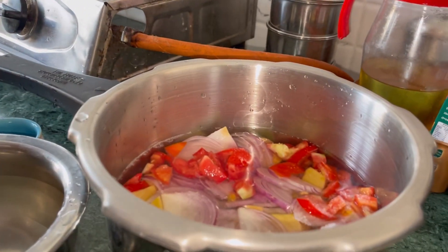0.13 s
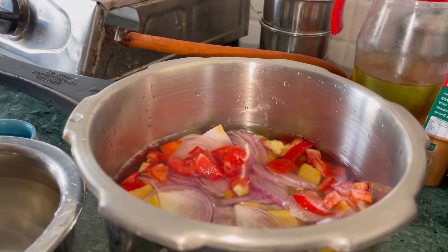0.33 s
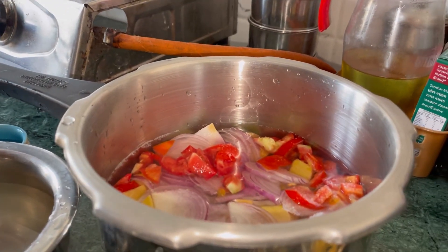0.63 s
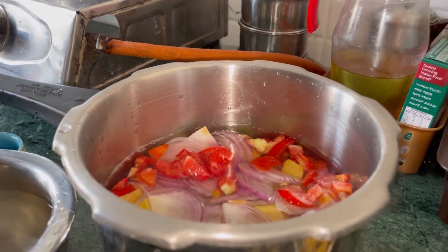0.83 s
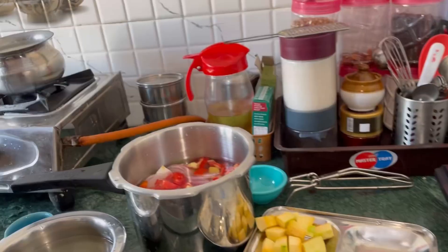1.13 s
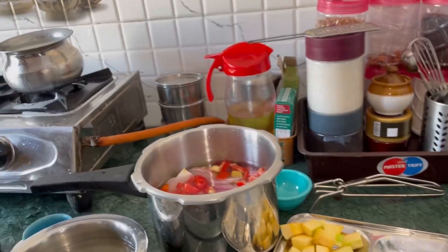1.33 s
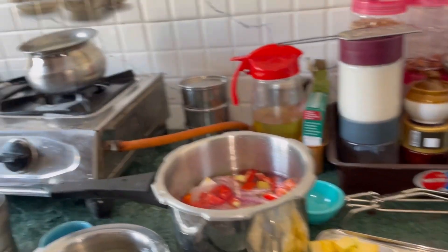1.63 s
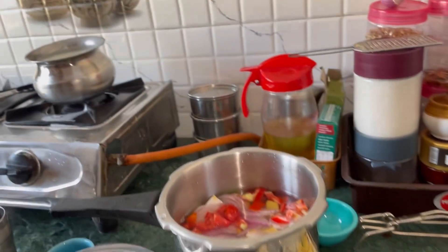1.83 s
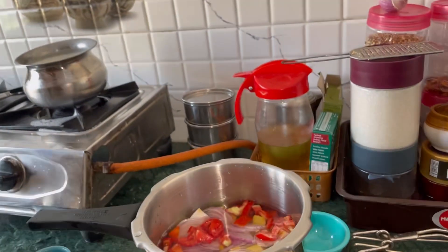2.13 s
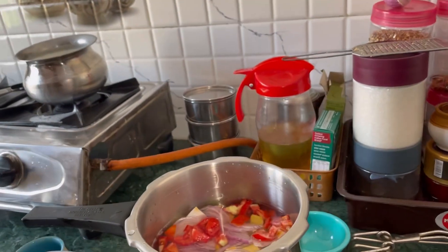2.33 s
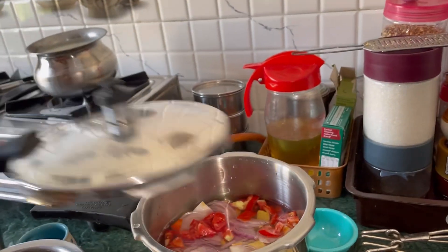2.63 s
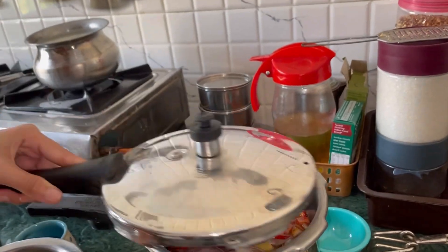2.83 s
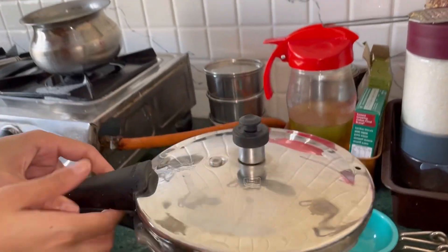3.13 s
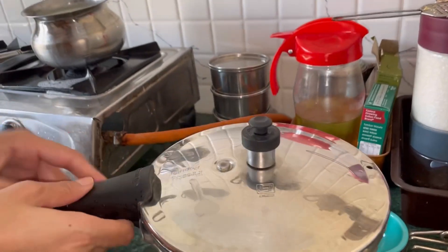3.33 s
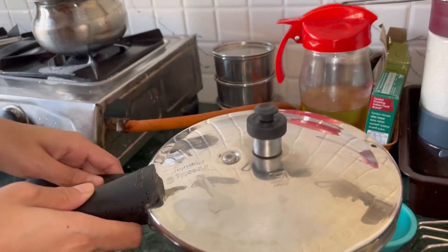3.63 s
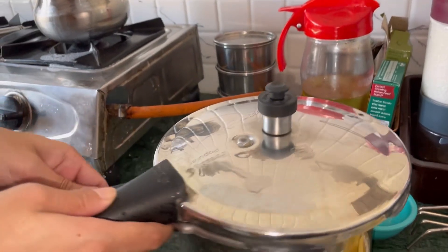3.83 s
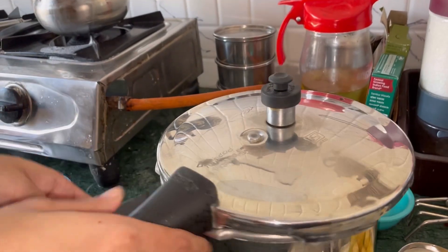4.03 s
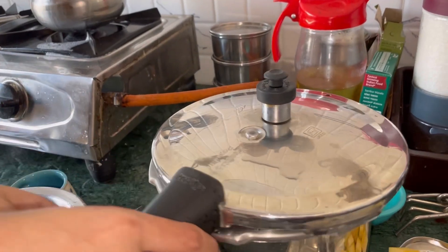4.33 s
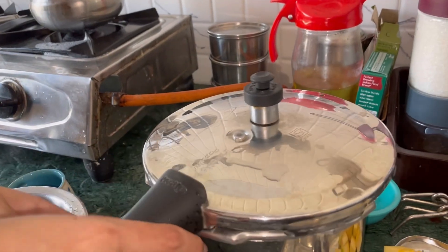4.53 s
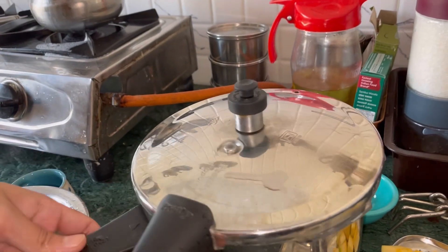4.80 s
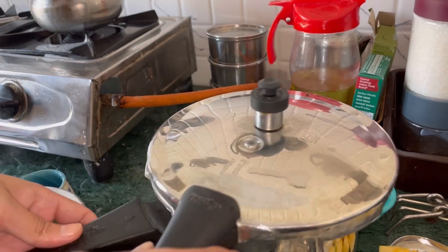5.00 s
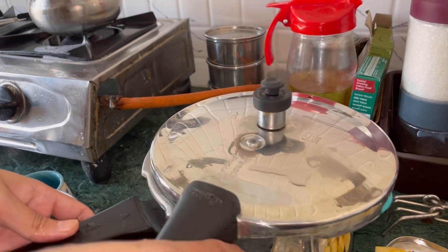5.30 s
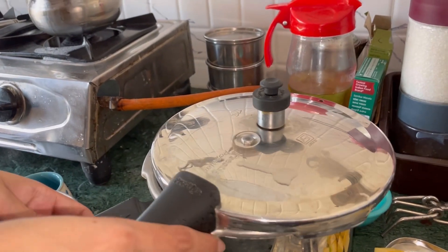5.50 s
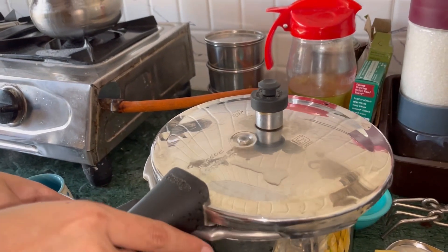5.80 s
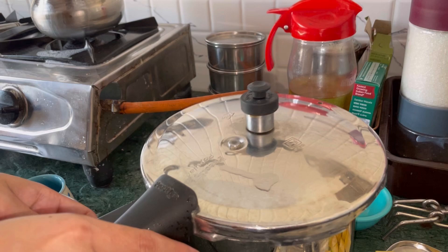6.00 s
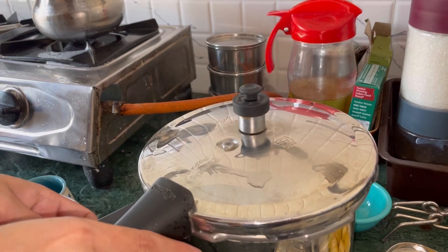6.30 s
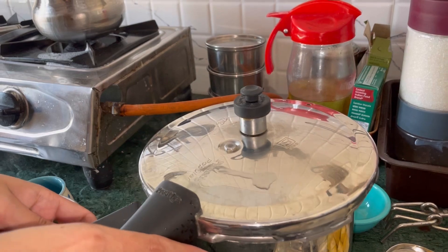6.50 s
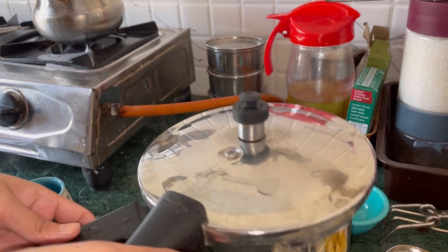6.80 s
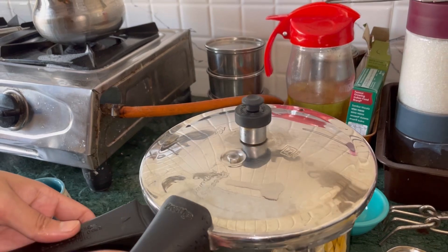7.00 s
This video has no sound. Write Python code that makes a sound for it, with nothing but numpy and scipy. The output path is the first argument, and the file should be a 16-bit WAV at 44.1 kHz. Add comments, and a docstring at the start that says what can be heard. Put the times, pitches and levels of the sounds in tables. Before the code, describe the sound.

Sharp metallic clinks, rattles and scrapes of a lid being fitted onto a pressure cooker, with hollow knocks and dull thumps on the counter.

```python
"""A small tiled kitchen, close to the counter, on a microphone with two ports a little apart.
A steel pressure cooker lid is lifted, set on its pot and twisted shut. The lid clinks and rattles
as blows ring its modes, and scrapes along the rim. A loose small part jingles, the rocking pot
thumps the counter, the air shut in the pot booms and the pot wall rings. Low room hum lies under it."""
import sys
import numpy as np
from scipy import signal
from scipy.fft import rfft, irfft, next_fast_len
from scipy.io import wavfile
from scipy.ndimage import uniform_filter1d

SR = 44100
rng = np.random.default_rng(int(sys.argv[2]) if len(sys.argv) > 2 else 0)


def bounce(signal):
    """Save signal as a 16-bit WAV file at the path given by the first command-line argument."""
    frames = np.transpose(np.atleast_2d(signal))
    limited = np.clip(frames, -1, 1)
    pcm = np.round(limited * 32767).astype(np.int16)
    wavfile.write(sys.argv[1], SR, pcm)


N = 315315

# the steel lid's modes: pitch_hz, relative_db, base_t60_s
LID_MODES = [(657, -7, 0.042), (742, 1.5, 0.13), (965, -13, 0.16), (1198, -1, 0.36), (1504, 1.5, 0.17),
             (2043, -1.5, 0.068), (2250, -9, 0.018), (2327, -8.5, 0.11), (2405, -7, 0.26), (2410, -5, 0.23),
             (2657, -6, 0.15), (2861, -6, 0.11), (3080, -2.5, 0.18), (3250, -7.5, 0.45), (3476, -6.5, 0.23),
             (3760, -11, 0.18), (4050, -1.5, 0.13), (4364, -8, 0.26), (4427, -8.5, 0.14), (4696, -5, 0.11),
             (5240, -12, 0.26), (5670, -9.5, 0.13), (6180, -1, 0.15), (6970, 1, 0.21), (7970, 12.5, 0.14),
             (8330, 13, 0.14), (9060, 7, .14), (8960, -17, 0.11), (10490, 7.5, 0.14), (11300, -16, 0.048)]
# the hiss of countless close modes between them: frequency_hz, density_db
LID_SHIMMER = [(400, -9.5), (700, 8.5), (1700, -0.5), (2500, 0.5), (4500, -5), (6500, -5.5), (8500, 6),
               (10500, 2.5), (13000, -6.5), (14000, 1), (16500, -48)]
# knocks of the lid on the pot: start_s, air_level_db, wall_above_air_db
POT_KNOCKS = [(2.959, -16, -6), (3.019, -19.5, -8), (3.053, -14, -15), (3.086, -20.5, -23),
              (3.156, -25.5, -8), (3.178, -23, -19), (3.204, -23, -11), (3.228, -25.5, -9),
              (3.437, -14.5, -12), (3.632, -24, -35), (3.658, -27, -30), (3.73, -25, -19),
              (3.755, -25, -19), (4.418, -19, -12), (4.538, -24.5, -23), (4.603, -29.5, -9),
              (4.661, -18, -28), (4.684, -19.5, -12), (4.712, -20, -30), (4.766, -20.5, -38),
              (4.784, -22.5, -31), (4.887, -18.5, -10), (4.906, -20, -26), (4.968, -19.5, -11),
              (4.983, -25, 1), (5.152, -24, -41), (5.343, -23, -24), (5.426, -29, -9), (5.465, -25, -25),
              (6.021, -18, -3.5), (6.148, -20.5, -25), (6.244, -25, -13), (6.603, -32, -29),
              (6.644, -27.5, -16), (6.771, -27.5, -27)]
SEATED_S = 2.9  # from here on the lid lies on the pot


def gain_of(db):
    """Decibels to amplitude."""
    return 10 ** (np.asarray(db) / 20)


def unit_rms(x):
    """Scales to an rms of one."""
    return x / np.sqrt(np.mean(x ** 2) + 1e-20)


def curve_at(points, hz, column=1):
    """Reads a table's column over a log-frequency axis."""
    table = np.transpose(points)
    return np.interp(np.log(hz + 1), np.log(table[0] + 1), table[column])


def add(mix, start_s, sound):
    """Mixes a sound in at a time."""
    part = mix[max(round(start_s * SR), 0):][:len(sound)]
    part += sound[:len(part)]


def coloured_noise(size, band_db):
    """White noise with a gain for each frequency bin."""
    return irfft(rfft(rng.standard_normal(size)) * gain_of(band_db), size)


def ring(hz, db, t60, rise_s):
    """Struck modes: dying sines of random phase."""
    t = np.arange(round(min(np.max(t60), 1 / 3) * SR))[:, None] / SR
    tones = np.sin(2 * np.pi * (hz * t + rng.random(np.size(hz))))
    return (gain_of(db - 60 * t / t60) * tones).sum(1) * (1 - np.exp(-t[:, 0] / rise_s))


def struck_db(modes, near_hz, lift_db):
    """Mode levels for one blow: uneven, and lifted for the modes nearest to it."""
    hz, db, _ = np.transpose(modes)
    nearness = np.exp(-(np.log(hz[:, None] / near_hz) / .03) ** 2).max(1)
    return db + lift_db * nearness + 1.36 * rng.standard_normal(len(hz))


def tilt_db(hz, treble_db, low_db):
    """Level of the lid's treble and low modes against the middle ones."""
    return np.interp(hz, [1700, 1900, 6500, 8000], [low_db, 0, 0, treble_db])


def room_hum():
    """Room tone: two unrelated low noises with drifting patches of colour; the level dips briefly."""
    # the hum's colour: frequency_hz, density_db
    spectrum = [(20, -34), (40, -39.5), (65, 7), (105, 1), (170, -4.5), (345, -7), (690, -10.5),
                (1400, -13.5), (2070, -23), (4000, -29.5), (6500, -36), (9000, -39.5), (12700, -47),
                (14000, -55), (16500, -65)]
    # its course: time_s, level_db, treble_lift_db
    course = [(0, -46, 13), (1.06, -45, 0), (1.12, -49.5, 7), (1.15, -44.5, 4), (1.9, -43.5, 1),
              (2.3, -42, 4.5), (2.9, -44, 0), (7.15, -44, -0.5)]
    time_s, level_db, treble_db = np.transpose(course)
    frames, hz = N // 256 + 5, np.fft.rfftfreq(1024, 1 / SR)
    draws = rng.standard_normal((frames, 513, 5)).T
    noise = draws[[0, 2]] + 1j * draws[[1, 3]]
    patches_db = 2.16 * unit_rms(uniform_filter1d(uniform_filter1d(draws[4], 8, 0), 14, 1))
    treble_share = np.clip((hz[:, None] - 1500) / 2500, 0, 1)
    lift_db = treble_share * np.interp(np.arange(frames) * 256 / SR, time_s, treble_db)
    noise *= gain_of(curve_at(spectrum, hz)[:, None] + patches_db + lift_db)
    hum = signal.istft(noise, nperseg=1024, noverlap=768)[1][:, :N]
    return unit_rms(hum) * gain_of(np.interp(np.arange(N) / SR, time_s, level_db))


def lid_blow(start_s, level_db, treble_db, low_db, lower_hz, upper_hz, seated_ring):
    """One blow on the lid: a crack, a hiss of close modes, and modes that dents split into beating pairs."""
    rise_s, split, gasket_t60_s, gasket_low_db = .0016, 0.011, 0.63, -29
    hz, _, t60 = np.transpose(LID_MODES)
    seated = start_s > SEATED_S  # the gasket then damps every mode and mutes the lowest
    ring_factor = seated_ring if seated else 1
    t60 = ring_factor / (1 / t60 + seated / gasket_t60_s)
    mode_db = struck_db(LID_MODES, [lower_hz, upper_hz], lift_db=16)
    middle = (hz > 1900) & (hz < 6300)
    mode_db -= 10 * np.log10(np.sum(gain_of(mode_db[middle]) ** 2))
    mode_db += tilt_db(hz, treble_db, low_db + seated * gasket_low_db)

    t = np.arange(16384) / SR
    f = np.fft.rfftfreq(len(t), 1 / SR)
    # a few close modes stand out, most of all near the blow
    lumps_db = 3.06 * unit_rms(uniform_filter1d(rng.standard_normal(len(f)), size=20)) - 4
    lumps_db += 4.5 * np.exp(-(np.log((f[:, None] + 1) / [lower_hz, upper_hz]) / 0.054) ** 2).max(1)
    hiss = coloured_noise(len(t), curve_at(LID_SHIMMER, f) + tilt_db(f, treble_db, low_db) + lumps_db)
    shimmer = gain_of(4 - 60 * t / (0.17 * ring_factor))
    crack = gain_of(11 - 60 * t / 0.012)
    out = np.pad(hiss * (shimmer + crack) * (1 - np.exp(-t / rise_s)), (0, SR // 2))
    add(out, 0, ring(hz, mode_db - 4, 1.035 * t60, rise_s))
    twin_hz = hz * (1 + split * rng.uniform(-1.05, 1, len(hz)))  # shifts with how the lid is held
    add(out, 0, ring(twin_hz, mode_db, .5 * t60, rise_s))
    return gain_of(level_db) * out


def lid_clinks():
    """Single blows on the lid, and rattles that smear a blow over a swarm of small contacts."""
    # blows, each with its two nearest modes: start_s, level_db, treble_db, low_db, lower_hz, upper_hz
    blows = [(0.0074, -22.5, -11.5, -9.5, 2620, 3730), (0.0150, -28.5, -17, -14, 2950, 4660),
             (1.1416, -45, -15, 7.5, 2440, 3140), (1.2033, -28, -14, -6.5, 1500, 2640),
             (1.2753, -21, -9.5, -8, 1500, 3150), (1.3602, -9.5, -15.5, -1, 2660, 2812),
             (1.2790, -24.5, -20, -24, 2345, 4660), (1.3778, -14.5, -16, -5, 2367, 3300),
             (1.4343, -25.5, -18, -32, 2630, 3240), (1.5985, -42, -24, 3, 2440, 3110),
             (1.8986, -30.5, -40, -22, 2860, 3020), (2.635, -23, -15, -21, 2466, 3016),
             (2.9607, -13, -8.5, -9.5, 2540, 3130), (3.0186, -23.5, -10, -15, 2370, 4700),
             (3.052, -17, -16, -11, 2205, 4560), (3.176, -33, -13.5, 2, 2490, 3800),
             (3.2296, -23.5, -12, 0, 2980, 4210), (3.251, -31, -31, -6, 2020, 2960),
             (3.4068, -39, -20, 2, 1910, 3020), (3.435, -18, -5.5, -1, 2050, 6170),
             (3.4548, -18, -24, -1.5, 2080, 4130), (3.6585, -35.5, -33, 4, 2430, 3150),
             (3.7257, -27.5, -14.5, -0.5, 2550, 4230), (3.8678, -32.5, -18, -1.5, 2820, 3560),
             (4.033, -38.5, -26, -5, 2530, 4560), (4.3332, -34.5, -19, 3, 2370, 3090),
             (4.4617, -23.5, -15.5, -9, 2470, 4590), (4.6046, -30, -19, 1, 2390, 3210),
             (4.6591, -29.5, -14, -2, 2370, 3900), (4.7739, -16, -13, -12, 2470, 4460),
             (4.9814, -14.5, -3.5, -16, 2360, 4620), (5.0095, -19.5, -34, -30, 2300, 3310),
             (5.0903, -21.5, -16, -11, 2760, 3170), (5.3732, -35, -25, -4, 2300, 3240),
             (5.894, -40, -41, -11, 2380, 3200), (6.0177, -20, -13, -3, 2490, 4490),
             (6.145, -25, -13.5, -5.5, 2320, 4130), (6.1938, -35, -22, -21, 2340, 3800),
             (6.2417, -30.5, -7.5, -0.5, 2460, 4370), (6.4408, -44.5, -32, 3, 2420, 3810),
             (6.644, -24, -14.5, -12, 2366, 3660), (6.765, -39, -17, 2, 2400, 4500)]
    # chattering contacts: the same columns, then chatter_s
    rattles = [(1.9168, -15, -20, -31, 2810, 2987, 0.015), (1.9535, -15, -11, -23, 3830, 4756, 0.011),
               (4.4165, -24, -15, -2, 2280, 2970, 0.0024), (4.6936, -25, -19, 4.5, 2260, 3960, 0.0034),
               (4.8828, -18, -4, -5, 2380, 3600, 0.0086), (4.9044, -25, -13, -19, 2130, 3530, 0.0053),
               (4.9334, -24, -15, -3, 2350, 4700, 0.0067), (6.5972, -31, -19, -8, 2400, 4660, 0.0099),
               (6.7849, -22, -20, -7, 2430, 3900, 0.0063), (6.8214, -19.5, -21, -7, 2440, 3440, 0.0026),
               (6.8480, -11.5, -13.5, -14, 2070, 4540, 0.0012)]
    out, t = np.zeros(N), np.arange(4096) / SR
    for start_s, *blow in blows:
        add(out, start_s, lid_blow(start_s, *blow, seated_ring=0.71))
    for start_s, *blow, chatter_s in rattles:
        swarm = rng.standard_normal(len(t)) * t * np.exp(-t / chatter_s)
        clink = lid_blow(start_s, *blow, seated_ring=0.56)
        add(out, start_s, signal.fftconvolve(clink, swarm / np.linalg.norm(swarm)))
    return out


def part_jingles():
    """A small loose steel part taps lightly: modes in beating pairs, and a bright fizz."""
    # taps, each with its two nearest modes: start_s, level_db, lower_hz, upper_hz
    taps = [(0.2796, -49, 3770, 9200), (0.7287, -32, 5000, 9420), (0.763, -31, 4950, 13760),
            (0.7903, -29.5, 4525, 8440), (0.859, -30, 4292, 9300), (1.6203, -46.5, 3800, 9840),
            (1.8444, -53, 4440, 9400), (2.239, -50, 4770, 8500)]
    # the part's modes: pitch_hz, relative_db, t60_s
    modes = [(3490, -11, 0.09), (4417, -12.5, 0.14), (5060, -12, 0.1), (8500, -2.5, 0.074),
             (9230, -7, 0.063), (9940, -6, 0.18), (10500, -20, 0.11), (11000, -26, .15), (11900, -13, .12),
             (12800, -19, .12), (13550, -3, 0.15), (14720, -16, .06), (15900, 5, .08)]
    hz, _, t60 = np.transpose(modes)
    fizz_db = np.interp(np.fft.rfftfreq(4096, 1 / SR), [3000, 7600, 14000, 16000], [-11.5, 1.5, -11, -14])
    out = np.zeros(N)
    for start_s, level_db, *near_hz in taps:
        mode_db = level_db - 9 + struck_db(modes, near_hz, lift_db=14)
        add(out, start_s, ring(hz, mode_db, t60, rise_s=0.00072))
        twin_hz = hz * (1 + 0.0051 * rng.uniform(-0.88, 1, len(hz)))
        add(out, start_s, ring(twin_hz, mode_db - 0.5, t60, rise_s=0.00062))
        fade = gain_of(level_db - 4.5 - np.arange(4096) / 103)
        add(out, start_s, fade * coloured_noise(4096, fizz_db))
    return out


def stroke_pressure(rise_s, start_db=-33, release_db_per_s=249):
    """One stroke along the rim builds to a rounded peak, then lets go."""
    t = np.arange(-rise_s, .25, 1 / SR)
    level_db = np.where(t < 0, start_db * (t / rise_s) ** 2, -release_db_per_s * t)
    return np.minimum((t + rise_s) / 0.0073, 1) * gain_of(level_db)


def rim_scrapes():
    """Steel grains catch on the rim in uneven clumps and feed the lid, the pot wall and the air inside."""
    # strokes of the lid along the rim: peak_s, rise_s, scrape_db, boom_db
    strokes = [(1.22, 0.14, -43, -68), (1.35, .15, -35, -66), (1.962, 0.12, -37.5, -44.5),
               (3.0, 0.047, -43, -38.5), (3.09, 0.18, -32.5, -53), (3.24, .14, -40.5, -46),
               (3.7, 0.16, -46, -38), (3.76, 0.07, -38.5, -43.5), (4.412, .15, -34.5, -34),
               (4.53, 0.13, -67, -41.5), (4.671, 0.14, -35, -34.5), (4.83, 0.21, -37.5, -37),
               (4.97, .16, -27, -29.5), (5.36, 0.099, -49, -42.5), (5.47, 0.17, -49, -38),
               (5.91, 0.16, -53.5, -45.5), (6.159, 0.033, -35.5, -31), (6.28, 0.071, -48, -42),
               (6.48, 0.058, -51.5, -40.5), (6.621, 0.084, -43.5, -36.5), (6.8, 0.1, -41, -35.5),
               (6.88, 0.13, -44.5, -47)]
    grains_per_s = 4000
    clumps = gain_of(2.1 * unit_rms(uniform_filter1d(rng.standard_normal(N), 300)))
    strength = clumps * gain_of(1.84 * rng.exponential(1, N))
    grains = strength * (rng.random(N) < grains_per_s / SR) * rng.choice([-1, 1], N)
    drive, f = rfft(grains), np.fft.rfftfreq(N, 1 / SR)
    lid_band = 0.37 * gain_of(curve_at(LID_SHIMMER, f)) + 0j
    for hz, db, t60 in LID_MODES:
        lid_band += gain_of(db - 8) / (1 + 2j * (f - hz) * t60 / 6.5)  # rim contact widens each mode
    lid_band *= gain_of(tilt_db(f, treble_db=-18, low_db=-1.5))
    wall_band = 1 / (1 + 2j * (f - 1343) / 60) ** 2
    air_band = sum(1 / (1 + 2j * (f - hz) / 126) ** 2 for hz in (365, 430))
    lid, wall, air = [unit_rms(irfft(drive * band, N)) for band in (lid_band, wall_band, air_band)]
    scrape, boom = np.zeros((2, N))
    for peak_s, rise_s, scrape_db, boom_db in strokes:
        pressure = stroke_pressure(rise_s)
        add(scrape, peak_s - rise_s, gain_of(scrape_db) * pressure)
        add(boom, peak_s - rise_s, gain_of(boom_db) * pressure)
    return scrape * lid + boom * (air + gain_of(-12.5) * wall)


def counter_thumps(pitch_hz=95.8):
    """The pot rocks on the counter and knocks three low resonances."""
    # thumps of the pot: start_s, level_db
    thumps = [(1.17, -39), (2.221, -35), (2.69, -41), (2.973, -26.5), (3.446, -24), (3.716, -35.5),
              (4.414, -32), (4.695, -29.5), (4.84, -24.5), (4.977, -25.5), (5.357, -33), (5.469, -39),
              (6.284, -28), (6.647, -32), (6.831, -32)]
    out, hz = np.zeros(N), pitch_hz * np.array([1, 1.7, 2.4])
    for start_s, level_db in thumps:
        add(out, start_s, ring(hz, level_db + np.array([3, -4, -9]), t60=0.18, rise_s=0.0083))
    return out


def air_booms():
    """The lid knocks the air in the pot; two weaker neighbours make its resonance throb."""
    # the resonance sinks as the gap under the lid closes and shifts as the lid turns: time_s, pitch_hz
    air_pitch = [(2.96, 585), (3.03, 494), (3.23, 386.5), (3.75, 306), (4.42, 372), (4.7, 394), (4.77, 372),
                 (4.9, 389), (4.97, 356), (5.4, 408), (6.02, 450), (6.25, 373), (6.62, 422), (6.77, 333)]
    out = np.zeros(N)
    for start_s, level_db, _ in POT_KNOCKS:
        hz = np.interp(start_s, *np.transpose(air_pitch)) * np.array([1, 1.16, .8])
        add(out, start_s, ring(hz, level_db + np.array([3, -4, -9]), t60=0.064, rise_s=0.0013))
    return out


def wall_rings(pitch_hz=1343):
    """The pot wall rings at each knock, a close pair of modes."""
    out, hz = np.zeros(N), pitch_hz * np.array([.98, 1.015])
    for start_s, air_db, above_db in POT_KNOCKS:
        add(out, start_s, ring(hz, air_db + above_db + np.array([0, -3]), t60=0.12, rise_s=0.0012))
    return out


def kitchen(direct, echo_db=-10):
    """The direct sound with a tail of echoes, and a scattered copy with another; both drift as things move."""
    decay = [(200, 0.51), (1000, 0.31), (4000, 0.32), (12000, 0.2)]  # frequency_hz, t60_s
    t, out = np.arange(N) / SR, np.zeros((2, N))
    for k in range(3):  # three echo patterns fade in and out in turn
        echoes = np.zeros((2, SR // 2))
        arrivals = np.arange(200, SR // 2 - 20, 20) + rng.integers(0, 20, (2, (SR // 2 - 201) // 20))
        np.put_along_axis(echoes, arrivals, rng.choice([-1., 1.], arrivals.shape), 1)
        hz, lag_s, bands = signal.stft(echoes, SR, nperseg=256)
        bands = bands * gain_of(-60 * lag_s / curve_at(decay, hz)[:, None])
        tail = signal.istft(bands, SR, nperseg=256)[1]
        tail *= gain_of(echo_db) / np.linalg.norm(tail[0])
        scatter = rng.standard_normal(400) * np.exp(-np.arange(400) / 180)
        tail[1, :400] += scatter / np.linalg.norm(scatter)
        drift = np.sqrt(2 / 3) * np.cos(np.pi * (t / .37 + k / 3))
        out += signal.fftconvolve((direct * drift)[None], tail, axes=1)[:, :N]
    out[0] += direct
    return out


def microphone_ports(pair, likeness_column):
    """The right port hears a phase-turned share of what the left hears, and the rest unrelated."""
    # the two ports: frequency_hz, right_lead_rad, left_louder_db, near_likeness, hum_likeness
    ports = [(102, 0, -1.5, 1, 0.97), (203, -0.4, 1, 0.92, 0.56), (420, 0.66, 0.8, 0.64, 0.73),
             (690, -1.36, 2, 1, 0.27), (1320, -1.5, 0, 0.5, 0.83), (1730, -0.5, -3, 0.41, 0.48),
             (1990, 0.64, 0, 0.48, 0.12), (3500, -1.94, 2, 0.93, 1), (3910, 0.8, 0.5, 0.22, 0.2),
             (4450, -0.8, -0.3, 0.78, 0.56), (6160, 1.23, 2, 0.41, 0.18), (7100, 3.5, 0.5, 1, 1),
             (7970, 3.5, 0.5, 0.98, 1), (8640, 4, -1, 0.78, 0.91), (9720, 5, 0, 0.99, 0.66),
             (11600, 7.5, 0.5, .999, .999), (13300, 7.5, -2, 0.9, 0.55), (13800, 9.5, 1.5, 1, .99)]
    size = next_fast_len(N + 4096)
    f = np.fft.rfftfreq(size, 1 / SR)
    left, unrelated = rfft(pair, size)
    likeness = curve_at(ports, f, likeness_column)
    right = likeness * np.exp(1j * curve_at(ports, f)) * left + np.sqrt(1 - likeness ** 2) * unrelated
    balance = gain_of(curve_at(ports, f, column=2) / 2)
    return irfft(np.array([left * balance, right / balance]), size)[:, :N]


def scene():
    """Lid, pot and counter near the microphone, over the hum of the kitchen."""
    pot = air_booms() + wall_rings() + counter_thumps()
    near = kitchen(lid_clinks() + rim_scrapes() + pot + part_jingles())
    return microphone_ports(near, likeness_column=3) + microphone_ports(room_hum(), likeness_column=4)


def record(dry):
    """The microphone's bass roll-off, soft overload on the hardest blow, then the band limit."""
    low_cut_hz, edge_hz = 50, 16600
    thin = signal.sosfilt(signal.butter(2, low_cut_hz, "high", fs=SR, output="sos"), dry)
    soft = thin / (1 + thin ** 4) ** (1 / 4)
    band_limit = signal.firwin(511, edge_hz, window=("kaiser", 9), fs=SR)
    return signal.oaconvolve(soft, band_limit[None], "same")


dry = scene()
out = record(dry)
bounce(out)
```